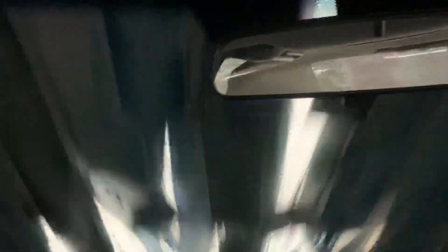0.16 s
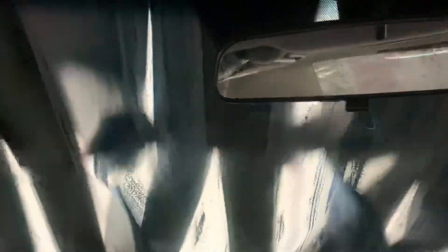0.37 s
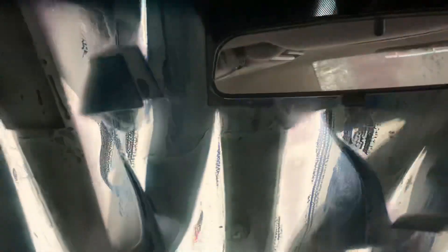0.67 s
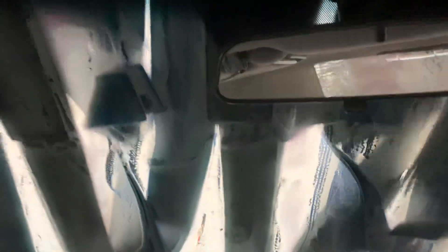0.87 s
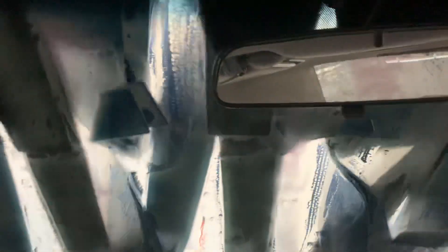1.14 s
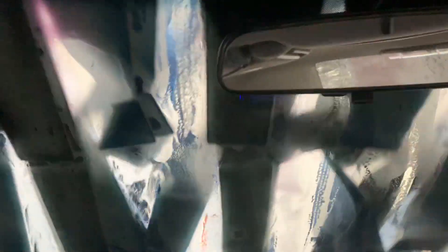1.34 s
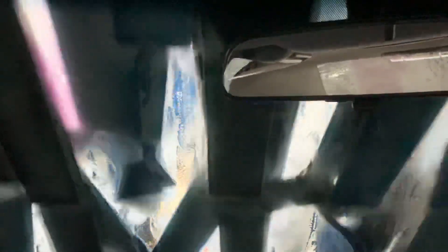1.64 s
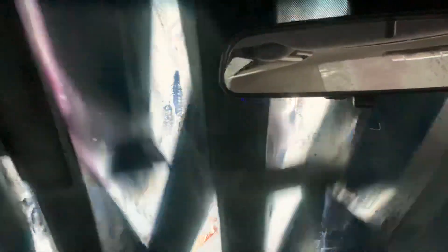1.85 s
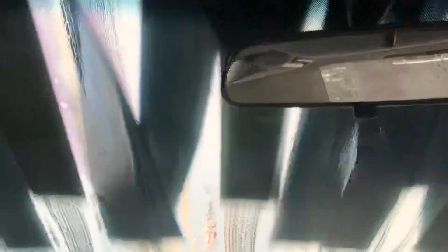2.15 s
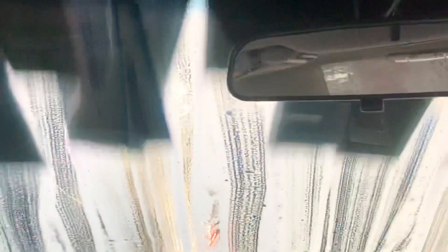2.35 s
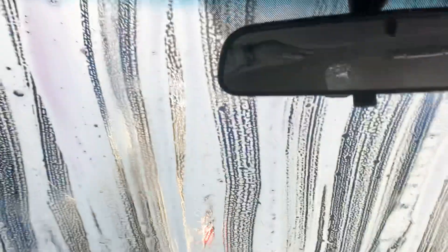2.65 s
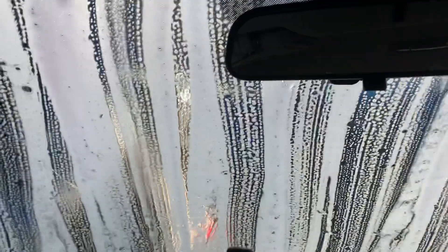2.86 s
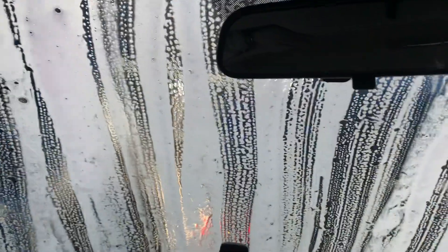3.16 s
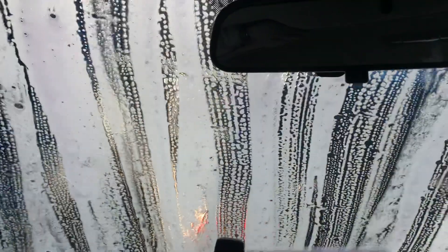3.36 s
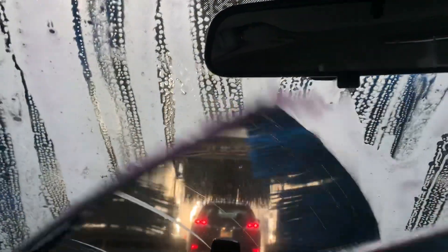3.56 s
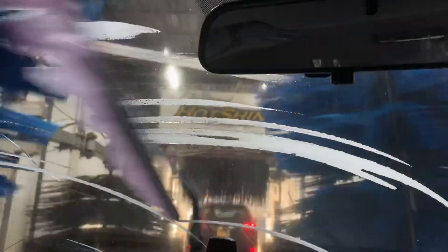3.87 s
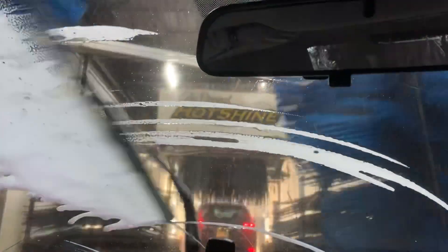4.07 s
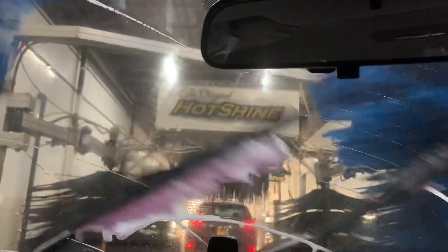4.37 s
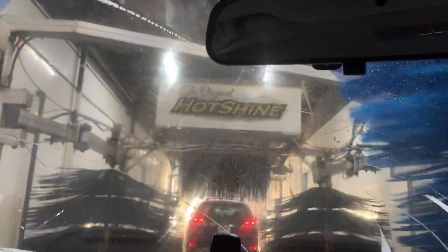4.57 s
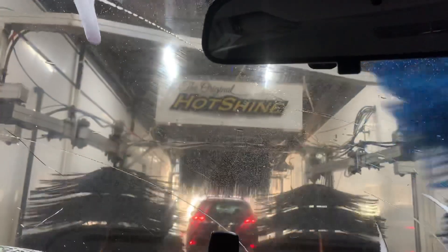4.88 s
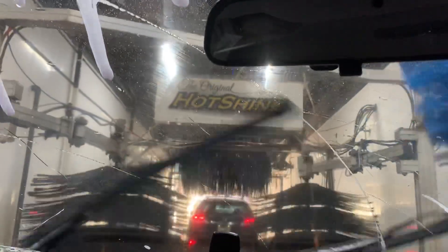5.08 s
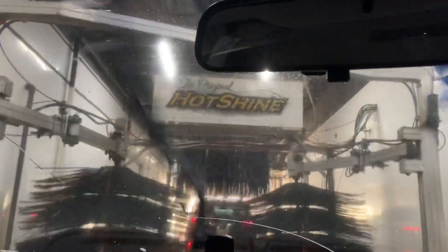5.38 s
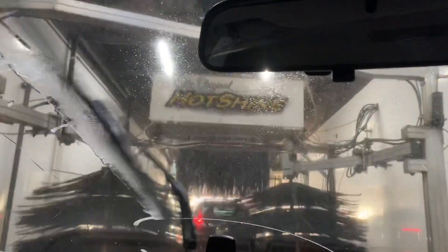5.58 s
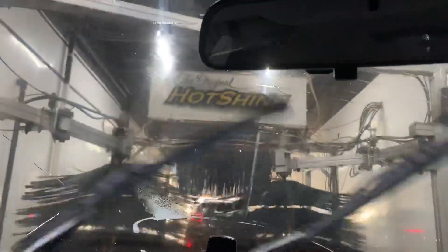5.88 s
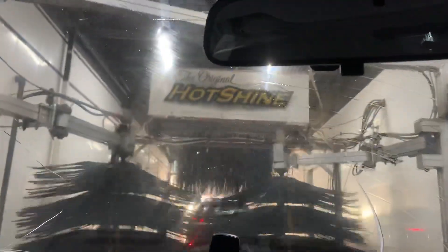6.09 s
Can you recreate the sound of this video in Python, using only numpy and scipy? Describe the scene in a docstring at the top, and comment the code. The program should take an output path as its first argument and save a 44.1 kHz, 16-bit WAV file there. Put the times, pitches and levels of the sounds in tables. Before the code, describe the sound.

Heard close from the front seat of a closed car in a tunnel wash: steady deep rumble, boomy muffled drumming of brushes, and cloth scuffing the roof. Spray swells and recedes on the glass. A heavy wet strip smacks the windshield just after two seconds. Later come wiper drags, double cloth thumps, more splats, and a growing watery drone on the hood.

```python
"""Inside a car wash

We sit in a car rolling through a tunnel wash. Machinery rumbles as filtered noise. Wet strips and brushes
drum as random blows on cabin resonances, rub and drag as scratchy noise, and thud, smack or whip at set times.
Spray and mist are dense random drops, and bigger gobs of water splat as short showers of noise.
Glass and sheet metal colour the water and cloth, and the small cabin smears the water sounds.
"""
import sys
import numpy as np
from scipy import signal
from scipy.fft import rfft, irfft, next_fast_len
from scipy.io import wavfile
from scipy.ndimage import uniform_filter1d, map_coordinates

SR = 44100
rng = np.random.default_rng(int(sys.argv[2]) if len(sys.argv) > 2 else 0)


def unload_audio(sound):
    """Save the sound as a 16-bit wav file, at the path given as the first command line argument."""
    columns = np.transpose(np.atleast_2d(sound))
    # keep every value between -1 and 1, then stretch to whole-number steps
    steps = np.round(np.clip(columns, -1, 1) * 32767)
    wavfile.write(sys.argv[1], SR, steps.astype(np.int16))


N = 274743

# dull thumps of cloth and brushes on the body: [t/s, peak before softening/dB, struck spot f/Hz]
FLAP_HITS = [(0.01, -12, 456), (0.062, -21, 570), (0.093, -20, 510), (0.954, -18, 324), (1.01, -16, 317),
             (1.108, -18, 675), (2.008, -17, 477), (2.944, -15.5, 376), (3.716, -23, 323),
             (3.791, -19, 296), (4.252, -11, 470), (4.324, -7.5, 413), (5.65, -18, 236), (5.672, -14, 475),
             (5.692, -11.5, 345), (5.712, -11, 224), (5.885, -15.5, 434), (5.966, -13.5, 330)]
# deep thuds as a strip or brush leans into the body: [t/s, peak/dB, f/Hz]
LEANING_THUDS = [(0.114, -20, 43.4), (0.299, -17.5, 47.6), (0.969, -14, 115), (1.409, -18.5, 115.5),
                 (1.694, -15, 49), (1.773, -13, 91.5), (1.98, -12, 132.5), (2.415, -18.5, 51.3),
                 (2.552, -14.5, 124), (2.946, -27, 118), (3.508, -13.5, 135), (3.64, -19.5, 40.8),
                 (3.725, -11.5, 134), (3.872, -22, 42.7), (4.181, -22, 44), (4.666, -27, 39),
                 (5.214, -14.5, 45.3), (5.287, -16, 46), (6.146, -13, 44.4)]
THUD_CYCLES = 2.24  # sets how many cycles a thud takes to swell and start to die
# a thin high hiss, one row: [t/s, length/s, level/dB, centre f/Hz]
HIGH_HISS = (2.13, .33, -69, 14200)
HISS_WIDTH_HZ = 1400
# a heavy wet strip smacks the windshield: [t/s, reference level/dB]
STRIP_SMACKS = [(2.18, -7)]
# biggest gobs of water on the glass: [t/s, peak before panels and cabin/dB, fizz against body/dB, length/s]
BIG_SPLATS = [(0.292, -29.5, -28, 0.039), (0.368, -40, -27, 0.052), (0.559, -31.5, -28, 0.084),
              (0.926, -33, -21, 0.024), (0.942, -27.5, -35, 0.045), (1.398, -28, -31, 0.04),
              (1.555, -22.5, -28, 0.074), (1.649, -21.5, -35, 0.097), (1.713, -25, -15, 0.05),
              (1.784, -35, -22, 0.032), (2.085, -33.5, -15.5, 0.028), (3.183, -34, 3, 0.021),
              (3.193, -28, -11, 0.034), (3.415, -29, -21, 0.057), (3.478, -34, -4, 0.027),
              (3.488, -21.5, -27, 0.088), (3.578, -23.5, -29, 0.065), (3.632, -28, -22, 0.07),
              (3.7, -20, -32, 0.035), (4.006, -39, -17, .04), (4.087, -22, -32, 0.092),
              (4.485, -33.5, -7, 0.045), (4.512, -27.5, -16, 0.019), (4.928, -29, -15, 0.12),
              (5.039, -25.5, -12, 0.064), (5.089, -26, -22, 0.044), (5.223, -20.5, -23, 0.053),
              (5.292, -28, -18, 0.045), (5.384, -37, -20, 0.02), (5.402, -23, -20, 0.075),
              (5.689, -18, -20.5, 0.098), (5.74, -30.5, -21, 0.067), (5.801, -16, -24, 0.095),
              (6.144, -18, -23, 0.05)]

# tone of the machinery rumble: [f/Hz, relative level/dB]
RUMBLE_TONE = [(15, -36), (25, 7.5), (36, 5.5), (52, 13), (70, 2), (120, -14), (300, -76)]
# tone of cloth rubbing: [f/Hz, relative level/dB]
CLOTH_TONE = [(100, -3.5), (190, -4), (280, -2.5), (380, -5.5), (520, -10), (700, -15), (1100, -26.5),
              (3000, -65.5)]
# tone of the dense drops: [f/Hz, relative level/dB]
SPRAY_TONE = [(250, -14.5), (550, 0.5), (800, 1), (1300, -2), (1600, -5), (2500, -8), (3200, -11),
              (4500, -20), (7000, -43), (11000, -61)]
# tone of the finer drops: [f/Hz, relative level/dB]
MIST_TONE = [(1500, -32), (3500, -11.5), (5200, 3.5), (6500, 0), (9000, -5), (10200, -11.5), (11500, -21),
             (14000, -15), (16000, -19)]
# tone of a bursting gob: [f/Hz, relative level/dB]
SPLASH_TONE = [(400, -4.5), (1100, 25), (2200, 20), (4000, 15), (6500, 5), (9300, -6), (11000, -27),
               (16000, -33)]
# tone of the fizz on top of a gob: [f/Hz, relative level/dB]
FIZZ_TONE = [(5000, -25), (9000, -0.5), (11500, -16), (14500, -6.5), (16000, -13)]
# tone of a cracking brush strand: [f/Hz, relative level/dB]
CRACK_TONE = [(700, -14), (2000, -1), (3500, 0), (6500, -5.5), (9300, -13), (11000, -28), (16000, -28)]
# tones of soft blows and of the strip's slap: [f/Hz, relative level/dB]
DRUM_TONE = [(30, -23), (60, -8.5), (160, 0.5), (230, -8), (500, -40), (2000, -72)]
FLAP_TONE = [(600, -26.0), (1000, 0.0), (1500, 6), (4000, -19)]
SLAP_TONE = [(200, -15), (600, -4), (1000, 4), (1250, 3), (1550, -8), (2100, -2), (2900, -13),
             (4000, -28), (9000, -40)]
WET_CLOTH_TONE = [(3200, -1.5), (5000, -11.0), (10000, -18)]
HOOD_TONE = [(50, -18), (110, -1.5), (900, -5.5), (2500, -22)]

# cabin resonances for drumming at the front: [f/Hz, width/Hz, relative level/dB]
FRONT_MODES = [(75, 7.3, 3), (107.3, 24, 1), (130.2, 26.2, 0.5)]
# cabin resonances for drumming at the sides: [f/Hz, width/Hz, relative level/dB]
SIDE_MODES = [(75.9, 4.9, 0.5), (122, 12.6, -12.5), (151.5, 12.7, -14)]
# resonances of the roof: [f/Hz, width/Hz, relative level/dB]
ROOF_MODES = [(307, 200, 7), (402, 71, 7), (434, 42, 2), (650, 25, 6.5), (860, 42, -1), (1110, 150, -18)]
# resonances of the windshield: [f/Hz, width/Hz, relative level/dB]
GLASS_MODES = [(690, 14, -8), (772, 14, 3), (885, 23, -5), (1116, 24, 6), (1240, 30, -13), (1452, 20, -7),
               (1715, 20, -12), (1975, 20, -0.5), (2340, 25, -13)]
# cabin heaved by the strip's bulk: [f/Hz, width/Hz, relative level/dB]
HEAVE_MODES = [(51.4, 9.3, 10.0), (127, 22, 5.7), (307, 8.8, 3.7)]
# where glass and sheet metal pass sound best: [f/Hz, width/Hz, boost/dB]
PANEL_MODES = [(280, 45, 4), (366, 20, 3.5), (484, 24, 4.5), (610, 45, 4), (711, 16, 3.5), (836, 44, 5),
               (1106, 75, 5.5), (1184, 16, 3.5), (1346, 110, 4), (1884, 36, 4), (1981, 45, 2.5),
               (2293, 120, 2.5), (2476, 100, 2.5), (2982, 80, 3), (3865, 54, 4), (5168, 150, 3),
               (5835, 45, 6), (6290, 120, 4), (6670, 110, 4), (7640, 110, 3.5), (8850, 160, 3.5)]
# sheet metal of the hood: [f/Hz, width/Hz, relative level/dB]
HOOD_MODES = [(140, 59, 3), (186, 26, 8), (207, 37, -6), (238.6, 9.4, 11), (599, 26, 1), (790, 46, -10)]
HOOD_S, HOOD_RISE_S, HOOD_DB = 5.55, 0.1, -24  # time of the half-way point, rise time and full level
TOP_HZ = 15820  # nothing is kept from here up

# cloth, wiper blade and brush tips dragged on wet glass:
# [t/s, length/s, level before panels and cabin/dB, centre f/Hz]
DRAG_STROKES = [(1.644, 0.035, -37, 2400), (1.709, 0.15, -34.5, 1140), (1.722, 0.14, -37.5, 2340),
                (1.851, 0.022, -37.5, 2500), (1.931, 0.18, -36, 1100), (2.006, 0.058, -39, 2270),
                (3.435, 0.056, -49, 3840), (3.58, 0.061, -32.5, 1100), (3.665, 0.14, -35, 1000),
                (3.693, 0.17, -51, 3800), (3.832, 0.1, -40, 2200), (4.884, 0.25, -35.5, 2030),
                (5.215, 0.061, -36.5, 2300), (6.03, 0.13, -33, 1880)]
# machinery rumble over time: [t/s, level before trim/dB]
RUMBLE_LEVEL = [(0, -26), (0.9, -29.5), (1.5, -29), (2.7, -32), (3.3, -31), (3.45, -29), (4.25, -26),
                (4.65, -29.5), (5.05, -29), (5.4, -29), (5.8, -25.5), (6.23, -28)]
# strips and brushes drumming on the body: [t/s, level before trim/dB]
DRUM_LEVEL = [(0, -22.5), (0.25, -21.5), (0.7, -26.5), (1.7, -21), (2.3, -25.5), (3.25, -25.5),
              (3.6, -22.5), (4.6, -20), (5.3, -20), (6.23, -19)]
# a brush leans harder (or, below zero, lighter) for a moment: [t/s, extra drumming/dB]
BRUSH_SHOVES = [(3.87, 6), (4.26, 5.5), (4.42, 3), (4.65, 6), (5.0, -1.5), (5.45, 5)]
SHOVE_HALF_WIDTH_S = 0.049
# cloth rubbing on the roof: [t/s, level before trim/dB]
RUB_LEVEL = [(0, -27.5), (0.3, -30), (0.95, -30), (1.08, -31.5), (1.25, -32), (1.7, -28.5), (2.1, -26.5),
             (2.35, -31.5), (2.7, -27), (3.2, -30.5), (3.75, -26), (5.45, -26.5), (5.7, -27), (6.23, -26.5)]
# spray swinging across the car: [t/s, half width/s, extra spray level/dB, extra mist level/dB]
SPRAY_SWEEPS = [(0.57, 0.2, 3.5, 0.5), (1.76, 0.32, 6.5, 8.5), (2.602, 0.18, 6.5, 5.5),
                (3.66, 0.24, 1.5, 2), (4.95, 0.085, -0.5, 11), (5.3, 0.18, -2, 3.5), (5.99, 0.44, 1.5, 5.5)]
SPRAY_DB, MIST_DB = -37, -61  # starting levels, before sweeps, shielding and surges
NEARING_S = 2.98  # from here on the car closes in on the next spray arch
SPRAY_DB_PER_S, MIST_DB_PER_S = 2.5, 2.5
# a strip lies across the glass and shields it: [t/s, half width/s, spray loss/dB], mist loses half as many dB
STRIP_SHIELDS = [(0.15, 0.038, 5), (1.07, 0.029, 3)]
# smaller gobs land at random, as strong as the mist is thick
GOBS_PER_S, GOB_OVER_MIST_DB, GOB_SPREAD_DB, GOB_FIZZ_DB, GOB_S = 18, 20, 1.5, -32, .04
# loose brush strands whip the glass: [t/s, level before panels/dB, contact length/s]
STRAND_WHIPS = [(1.708, -40, .012), (5.673, -31.5, .008), (5.731, -34, .008), (5.9312, -27.5, .01)]
WHIP_T60_S = .035  # time to fade by 60 dB after contact


def amp(db):
    """Turn decibels into a plain gain."""
    return 10 ** (np.asarray(db) / 20)


def unit(x):
    """Scale to an average strength (rms) of 1."""
    return x / np.sqrt(np.mean(x ** 2) + 1e-20)


def level_curve(rows):
    """Draw straight lines between (time, level) points, one value per sample."""
    s, db = np.transpose(rows)
    return np.interp(np.arange(N) / SR, s, db)


def wobble(rate):
    """A smooth random curve with rate knots a second."""
    return map_coordinates(rng.standard_normal(2048), [np.arange(N) * rate / SR], mode="wrap")


def swell(s, half_width):
    """A smooth rise and fall around time s, 1 at the top."""
    return np.exp(-((np.arange(N) / SR - s) / half_width) ** 2)


def filtered(x, response):
    """Filter x by a response that depends on frequency."""
    m = next_fast_len(len(x) + SR // 4)
    spectrum = rfft(x, m) * response(np.fft.rfftfreq(m, 1 / SR))
    return irfft(spectrum, m)[:len(x)]


def colour(points):
    """A tone curve through (Hz, dB) points on a log frequency axis."""
    f, db = np.transpose(points)
    return lambda hz: amp(np.interp(np.log(hz + 1), np.log(f), db))


def ringing(modes):
    """Damped resonances that ring after a push, with alternating signs."""
    def response(f):
        total = 0
        for k, (centre, width, db) in enumerate(modes):
            damping = 1j * f * width
            total = total + (-1) ** k * amp(db) * damping / (centre * centre - f * f + damping)
        return total
    return response


def ring(push, modes):
    """Let a push set resonances ringing, scaled to rms 1."""
    return unit(filtered(push, ringing(modes)))


def through_panels(x):
    """Glass and sheet metal pass sound best at their own resonances."""
    def response(f):
        return amp(sum(db / (1 + (2 * (f - c) / width) ** 2) for c, width, db in PANEL_MODES))
    return filtered(x, response)


def impacts(rate, spread_db):
    """Random tiny blows, rate a second, whose sizes vary by spread_db; rms 1."""
    hit = rng.random(N) < rate / SR
    size = amp(spread_db * np.clip(rng.standard_normal(N), -2, 2))
    return unit(hit * size * rng.choice([-1, 1], N))


def clumps(rate, life, spread_db):
    """Random surges of rms 1, as of gobs arriving: each starts at once and drains away."""
    size = amp(spread_db * np.clip(rng.standard_normal(N), -1.5, 1.5))
    arrivals = (rng.random(N) < rate / SR) * size
    flow = signal.lfilter([1], [1, -np.exp(-1 / (life * SR))], arrivals)
    return unit(flow - flow.mean())


def burst(t, rise, t60):
    """A puff of noise that swells and dies away."""
    return rng.standard_normal(len(t)) * (1 - np.exp(-t / rise)) * amp(-60 * t / t60)


def contact(t, seconds, scuff):
    """One smooth push, trailed by the scuff of the cloth sliding off."""
    push = t / seconds * np.exp(-t / seconds)
    return unit(push) + scuff * unit(burst(t, rise=0.0018, t60=0.22))


def add(track, s, sound, db):
    """Mix a sound into the track at time s with its peak at db."""
    start = max(round(s * SR), 0)
    part = track[start:start + len(sound)]
    part += (amp(db) * sound / np.abs(sound).max())[:len(part)]


def steadied(x, seconds, share):
    """Partly even out the slow swells of a noise; share 1 evens them fully."""
    span = int(seconds * SR)
    power = uniform_filter1d(uniform_filter1d(x ** 2, span), span // 2)
    power = np.abs(power) + 1e-12
    return unit(x / power ** (share / 2))


def cabin(x, t60, ripple):
    """The small padded cabin smears each tick briefly; its many modes finely comb the sound (ripple 0-1)."""
    tail = burst(np.arange(SR // 8) / SR, rise=0.00025, t60=t60)
    m = next_fast_len(N + len(tail))
    modes = rfft(tail, m)
    power = np.abs(modes) ** 2
    comb = (power + .5 * np.mean(power)) ** (ripple / 2)
    comb /= np.sqrt(uniform_filter1d(comb ** 2, size=1200))  # level on the broad scale
    return irfft(rfft(x, m) * comb * modes / np.abs(modes), m)[:N]


def drumming(modes):
    """Many soft blows a second set the cabin air ringing."""
    soft = colour(DRUM_TONE)
    blows = impacts(rate=900, spread_db=0.0)
    return unit(filtered(blows, lambda f: ringing(modes)(f) * soft(f)))


def machinery():
    """The conveyor rumbles; at the side brushes, the drumming moves to the lowest cabin mode."""
    rumble = filtered(rng.standard_normal(N), colour(RUMBLE_TONE))
    rumble = steadied(rumble, seconds=0.05, share=0.64)
    rumble_db = level_curve(RUMBLE_LEVEL) + 3.5 + 1.1 * wobble(rate=22)

    # crossfade from front to side drumming
    side = np.interp(np.arange(N) / SR, [3.7, 4.55], [0, np.pi / 2])
    boom = np.cos(side) * drumming(FRONT_MODES) + np.sin(side) * drumming(SIDE_MODES)
    boom = steadied(boom, seconds=.08, share=.85)
    shoves_db = sum(db * swell(s, SHOVE_HALF_WIDTH_S) for s, db in BRUSH_SHOVES)
    drum_db = level_curve(DRUM_LEVEL) + shoves_db - 1.1 + 0.82 * wobble(rate=8.3)
    return amp(rumble_db) * rumble + amp(drum_db) * boom


def water_levels():
    """Spray and mist in dB: they follow the sweeps, sink behind a strip and grow towards the next arch."""
    nearing = np.maximum(np.arange(N) / SR - NEARING_S, 0)
    spray_db = SPRAY_DB + SPRAY_DB_PER_S * nearing
    mist_db = MIST_DB + MIST_DB_PER_S * nearing
    for s, half_width, more_spray_db, more_mist_db in SPRAY_SWEEPS:
        sweep = swell(s, half_width)
        spray_db = spray_db + more_spray_db * sweep
        mist_db = mist_db + more_mist_db * sweep
    loss_db = sum(db * swell(s, half_width) for s, half_width, db in STRIP_SHIELDS)
    return spray_db - loss_db, mist_db - loss_db / 2


def on_panels(x, tone):
    """Give a noise its tone, then pass it through the panels."""
    return unit(through_panels(filtered(x, colour(tone))))


def rubbing():
    """Cloth scuffs the roof: many small catches mixed with smooth noise."""
    scuffs = unit(impacts(rate=600, spread_db=2.5) + 0.89 * rng.standard_normal(N))
    rub = steadied(on_panels(scuffs, CLOTH_TONE), seconds=.04, share=.6)
    return amp(level_curve(RUB_LEVEL) + 1.5 + 1.24 * wobble(rate=22)) * rub


def spraying(spray_db, mist_db):
    """Dense drops drum on the panels and finer ones prickle on the glass, surging together."""
    surge = 2.6 * np.tanh(clumps(rate=75, life=.009, spread_db=5) / 2.6)  # tops rounded off
    drops = unit(impacts(rate=1100, spread_db=2.5) + 0.91 * rng.standard_normal(N))
    droplets = unit(impacts(rate=1500, spread_db=1.0) + 0.5 * rng.standard_normal(N))
    spray = amp(spray_db + 2.0 * surge) * on_panels(drops, SPRAY_TONE)
    mist = amp(mist_db + 2.3 * surge) * on_panels(droplets, MIST_TONE)
    return spray + mist


def splats(mist_db):
    """Each gob of water bursts into a short shower of droplets."""
    out, t = np.zeros(N), np.arange(SR // 4) / SR
    small = []
    for i in np.flatnonzero(rng.random(N) < GOBS_PER_S / SR):
        db = mist_db[i] + GOB_OVER_MIST_DB + GOB_SPREAD_DB * rng.standard_normal()
        small.append((i / SR, db, GOB_FIZZ_DB, GOB_S))
    for s, db, fizz_db, length in list(BIG_SPLATS) + small:
        shower = burst(t, rise=0.0058, t60=length)
        shower = shower * amp(5.6 * rng.standard_normal(len(t)))  # droplets of uneven size
        body = unit(filtered(shower, colour(SPLASH_TONE)))
        fizz = unit(filtered(shower, colour(FIZZ_TONE)))
        add(out, s - .004, body + amp(fizz_db) * fizz, db)
    return out


def flaps():
    """A soft flap bends the panel at the struck spot, then the roof's own modes join in."""
    out, t = np.zeros(N), np.arange(SR // 4) / SR
    for s, db, hz in FLAP_HITS:
        push = filtered(contact(t, seconds=0.00033, scuff=0.3), colour(FLAP_TONE))
        bend = ring(push, [(hz, hz / 4, 0)])
        spot = ring(bend, [(hz, hz / 2, 0)])
        add(out, s - .001, spot + 0.31 * ring(spot, ROOF_MODES), db)
    return out


def thuds():
    """The weight of a strip or brush leans in and heaves the cabin air for a few cycles."""
    out, t = np.zeros(N), np.arange(SR // 3) / SR
    for s, db, hz in LEANING_THUDS:
        u = t * hz / THUD_CYCLES
        wave = np.sin(2 * np.pi * (hz * t + rng.random()))
        add(out, s, u * np.exp(-u * u) * wave, db)
    return out


def strokes():
    """Each stroke sticks and slips on the wet glass, quick to swell and slower to fade."""
    out, t = np.zeros(N + SR), np.arange(SR // 4) / SR
    for s, length, db, hz in DRAG_STROKES:
        grip = amp(2.8 * clumps(rate=110, life=.007, spread_db=3))
        slips = grip * (impacts(rate=1200, spread_db=2) + .4 * rng.standard_normal(N))
        band = colour([(hz / 5, -30), (hz / 2, -9), (hz, 0), (hz * 1.3, -3), (hz * 2, -17),
                       (hz * 4, -42), (hz * 8, -60)])
        scrape = steadied(filtered(slips[:len(t)], band), seconds=0.045, share=0.83)
        shape = np.sin(np.pi * np.clip(t / length, 0, 1) ** 0.5)
        out[round(s * SR):][:len(t)] += amp(db) * shape * scrape
    return out[:N]


def whips():
    """A strand cracks at once, crackles while its length lands on the glass, then dies away."""
    out, t = np.zeros(N), np.arange(SR // 8) / SR
    for s, db, held in STRAND_WHIPS:
        ticks = impacts(rate=2500, spread_db=3)[:len(t)] + .6 * rng.standard_normal(len(t))
        crackle = unit(filtered(ticks, colour(CRACK_TONE)))
        fade_db = -60 * np.maximum(t - held, 0) / WHIP_T60_S
        out[round(s * SR):][:len(t)] += crackle * amp(db + fade_db)
    return through_panels(out)


def hiss():
    """A thin, very high band of noise comes and goes."""
    s, length, db, hz = HIGH_HISS
    u = np.clip((np.arange(N) / SR - s) / length, 0, 1)
    shape = np.sqrt(np.abs(np.sin(np.pi * u)))
    band = filtered(rng.standard_normal(N), lambda f: 1 / (1 + (2 * (f - hz) / HISS_WIDTH_HZ) ** 2))
    return amp(db) * shape * unit(band)


def smacks():
    """The heavy strip's tip rings the windshield, then its bulk lands and heaves the cabin air."""
    out, t = np.zeros(N), np.arange(SR // 4) / SR
    for s, db in STRIP_SMACKS:
        tip = ring(contact(t, seconds=0.00008, scuff=0.15), GLASS_MODES)
        slap = filtered(burst(t, rise=.001, t60=.05), colour(SLAP_TONE))
        roof = ring(contact(t, seconds=.0002, scuff=0.4), ROOF_MODES)
        heave = ring(contact(t, seconds=0.00085, scuff=0.39), HEAVE_MODES)
        add(out, s - .0005, tip, db - 0.5)
        add(out, s, slap, db - 5)
        add(out, s + .006, roof, db - 2)
        add(out, s + 0.0235, heave, db - 0.5)
    return out


def hood():
    """Heavy water from the next arch reaches the hood and sets it droning."""
    reach = 1 / (1 + np.exp((HOOD_S - np.arange(N) / SR) / HOOD_RISE_S))
    soft = colour(HOOD_TONE)
    blows = impacts(rate=720, spread_db=3.5)
    drone = filtered(blows, lambda f: ringing(HOOD_MODES)(f) * soft(f))
    return amp(HOOD_DB) * reach * steadied(drone, seconds=0.079, share=0.32)


def scene():
    """Everything as heard from the front seat."""
    spray_db, mist_db = water_levels()
    blows = filtered(flaps() + smacks(), colour(WET_CLOTH_TONE))  # wet cloth is too soft to click
    body = machinery() + rubbing() + blows + thuds() + hood()
    on_glass = through_panels(splats(mist_db) + strokes())
    water = cabin(spraying(spray_db, mist_db) + on_glass, t60=.027, ripple=.65)
    return (body + water + whips() + hiss())[None]


def record(dry):
    """The phone that picks up the sound keeps only what lies below TOP_HZ."""
    return filtered(dry[0], lambda hz: hz < TOP_HZ)[None]


dry = scene()
out = record(dry)
unload_audio(out)
```